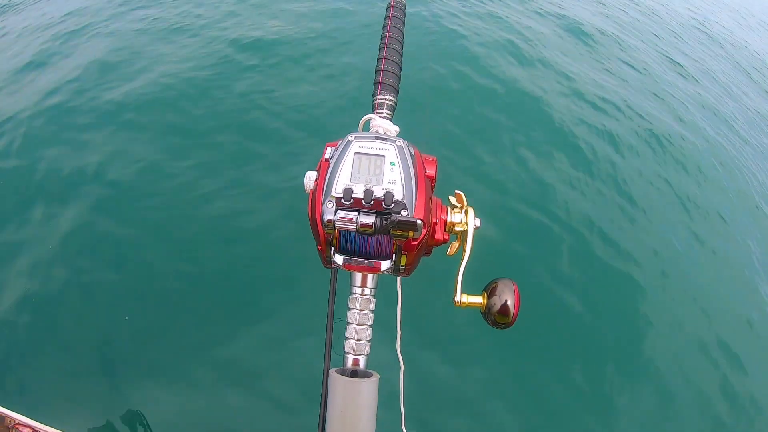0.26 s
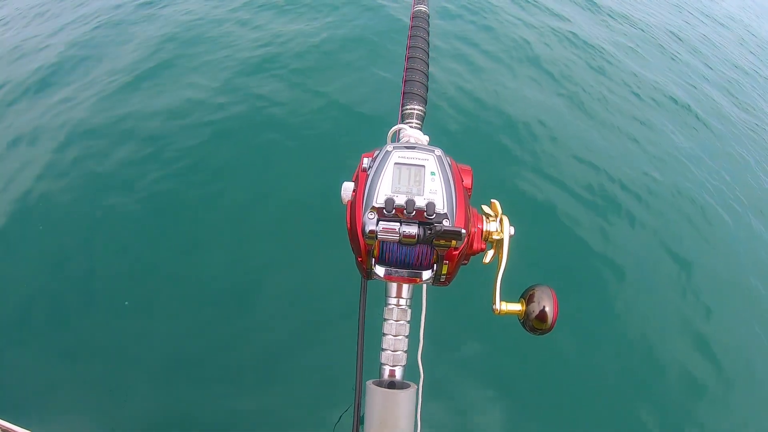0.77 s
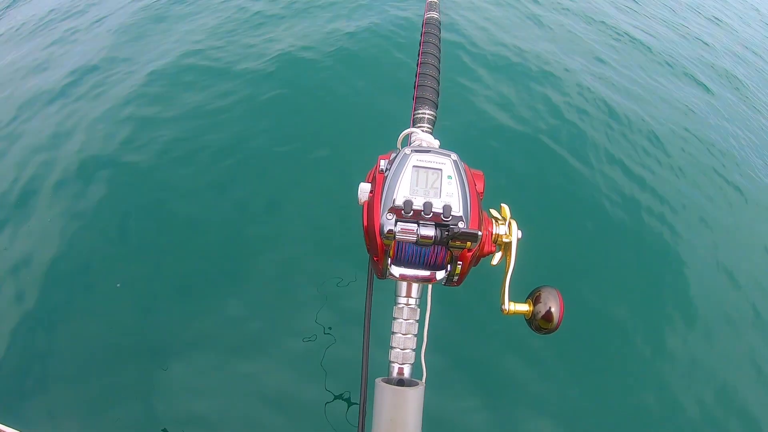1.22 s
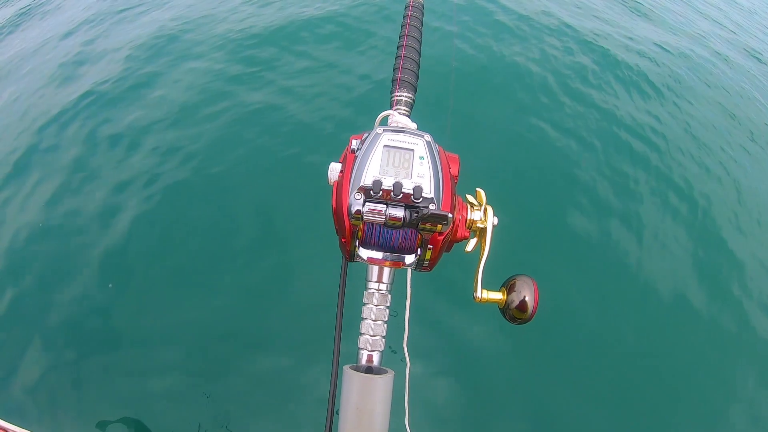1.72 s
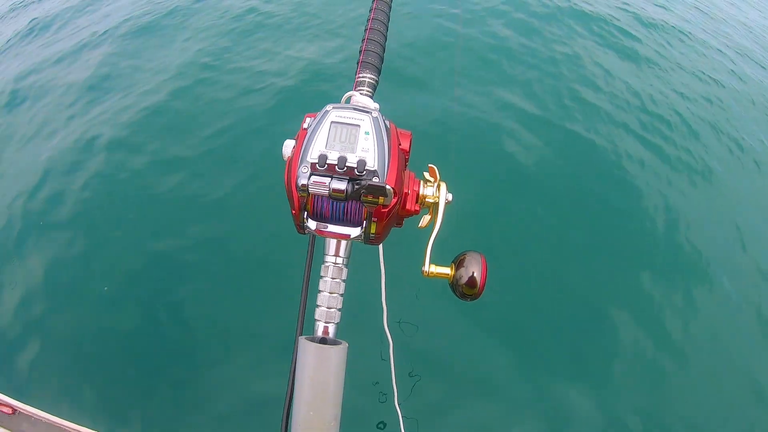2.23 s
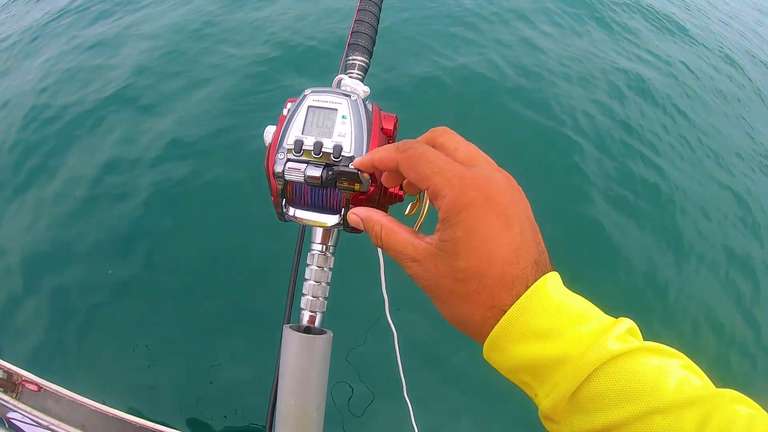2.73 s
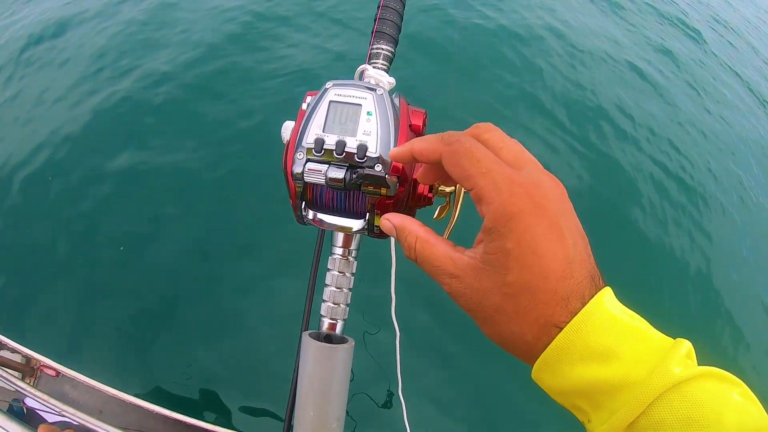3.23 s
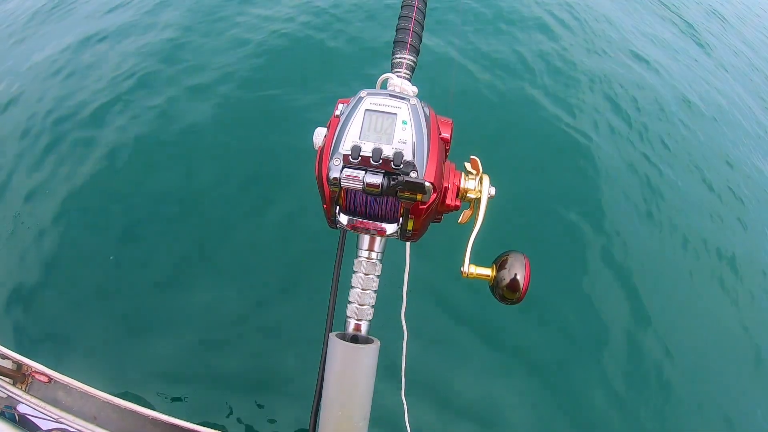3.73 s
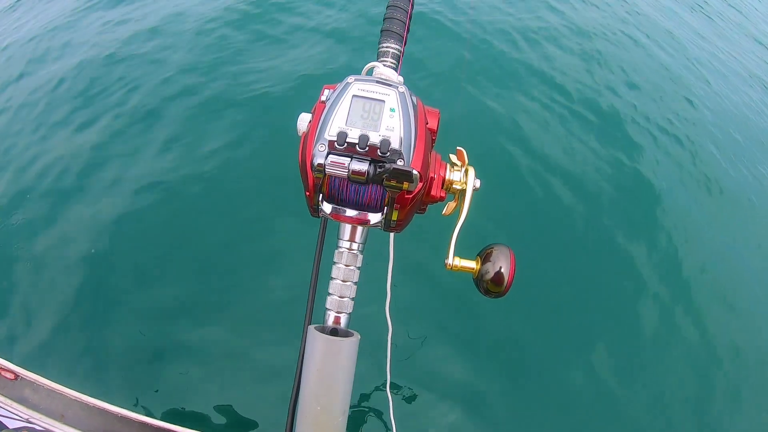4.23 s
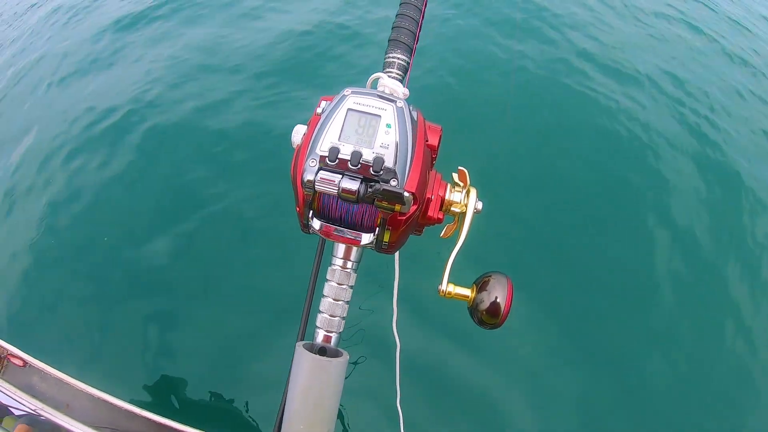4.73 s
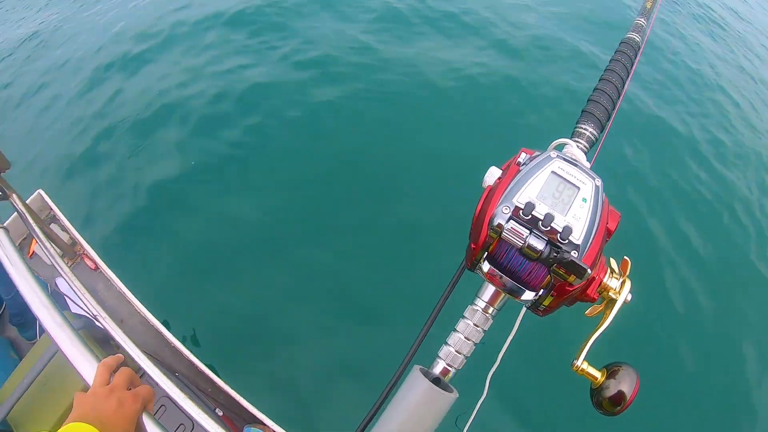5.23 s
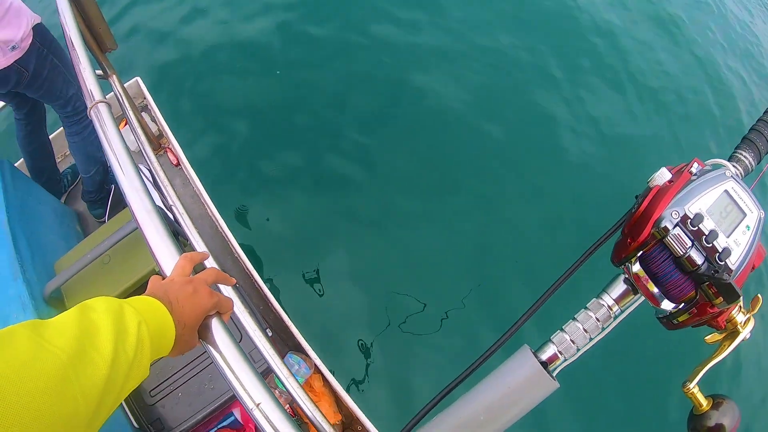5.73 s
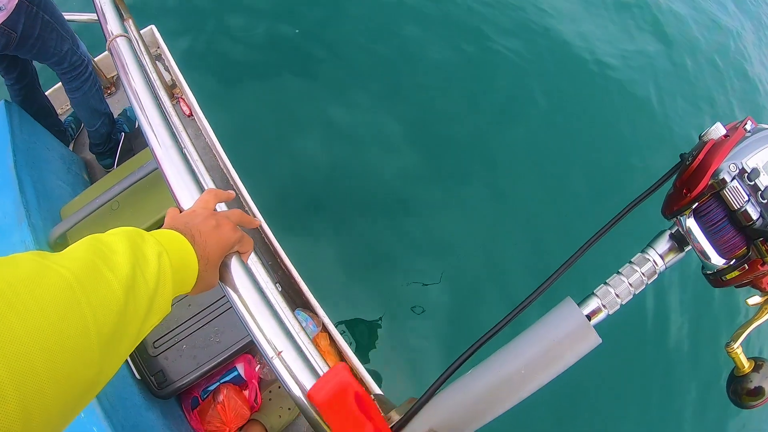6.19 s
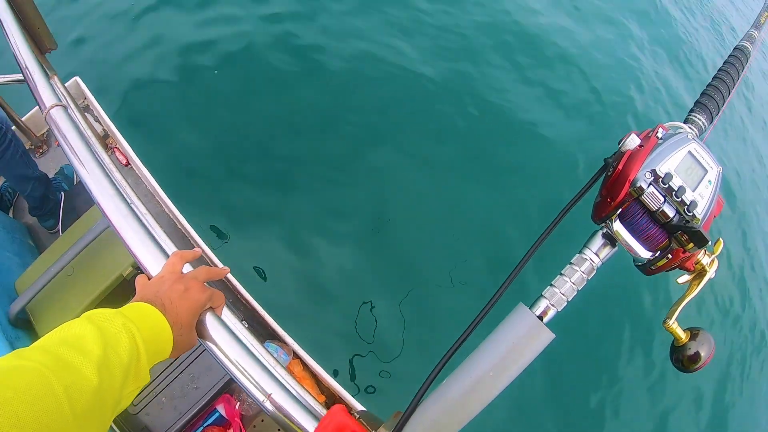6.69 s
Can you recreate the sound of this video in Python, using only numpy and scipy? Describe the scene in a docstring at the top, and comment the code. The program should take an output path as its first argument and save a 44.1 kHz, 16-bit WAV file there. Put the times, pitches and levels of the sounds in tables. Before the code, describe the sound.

An electric fishing reel runs without pause close to a head-worn microphone outdoors on a boat. Its buzzing, nearly constant whine carries a gritty gear rasp, tooth chatter and a thin, high bearing squeak. Small waves slap and bubble against the hull now and then, and low gusts rumble on the microphone. One dull bump lands near the middle; towards the end the head turns and the whine changes colour and stereo balance.

```python
"""An electric fishing reel winds in line on a boat, close to a head-worn camera. Its motor and gear teeth whine
at a nearly constant speed over a rasp of tooth contact; the spool gear wavers with the pull of the fish.
Loose teeth chatter, a dry bearing squeaks, and a hand held by the reel reflects some tones and bumps it once.
Water slaps the hull, gusts touch the microphone, and near the end the head turns towards the deck.
Tones follow the turning wheels; shaped noise makes rasp, water and wind."""
import sys
import numpy as np
from scipy import signal
from scipy.fft import rfft, irfft
from scipy.io import wavfile
from scipy.ndimage import map_coordinates

SR = 44100
rng = np.random.default_rng(int(sys.argv[2]) if len(sys.argv) > 2 else 0)


def wrap_up_sound(samples):
    """Save the sound to the file named by the first command line argument, as 16-bit audio."""
    columns = np.atleast_2d(samples).T
    # keep every value between -1 and 1, then stretch to whole-number steps
    tamed = np.clip(columns, -1, 1)
    steps = np.round(tamed * 32767).astype(np.int16)
    wavfile.write(sys.argv[1], SR, steps)


N = 306495
T = np.arange(N) / SR
FREQS = np.fft.rfftfreq(N, 1 / SR)
SIDES = np.array([[.5], [-.5]])  # shares a left-right difference between the two ports

IDLER_TEETH = 14
MOTOR_PER_IDLER = 17 / 5  # motor turns per idler turn


def from_db(db):
    """Decibels to gain."""
    return 10 ** (np.asarray(db) / 20)


def curves(rows):
    """Each column of a time table, joined by straight lines."""
    s, *columns = np.transpose(rows)
    return [np.interp(T, s, c) for c in columns]


def spectra(rows, at=FREQS):
    """Each column of a frequency table, joined on a log axis."""
    hz, *columns = np.transpose(rows)
    return [np.interp(np.log(at + 1), np.log(hz), c) for c in columns]


def noise(db):
    """Noise with the given level per Hz."""
    return irfft(rfft(rng.standard_normal(N)) * from_db(db), N) * np.sqrt(SR / 2)


def unit(x):
    """Scale to rms 1."""
    return x / np.sqrt(np.mean(x ** 2))


def walk(rate):
    """Random wander of spread 1: straight lines between `rate` new values a second."""
    steps = rng.standard_normal(2048)
    place = T * rate
    k = place.astype(int) % (len(steps) - 1)
    between = steps[k] + (steps[k + 1] - steps[k]) * (place % 1)
    return between * np.sqrt(3 / 2)  # makes up for the spread lost between the values


def ports(wave, balance_db, lead_rad):
    """A complex tone as it reaches the left and right microphone port."""
    return np.real(wave * from_db(SIDES * balance_db) * np.exp(1j * SIDES * lead_rad))


def tone(turns):
    """A complex tone that follows a count of cycles, from a random start."""
    angle = (2 * np.pi * ((turns + rng.random()) % 1)).astype(np.float32)
    return np.cos(angle) + 1j * np.sin(angle)


def ring(t, hz, peak_s):
    """A damped ring that swells to height 1 at `peak_s`, then dies away."""
    return (t / peak_s) ** 2 * np.exp(2 - 2 * t / peak_s + 2j * np.pi * hz * t)


# Colour of the wind rumble. Each row: frequency in Hz, relative level in dB.
BREEZE_COLOUR = [(12, -20), (30, -5), (52, 4), (100, -4), (180, -8.5), (400, -63), (1200, -56)]
# Gusts on the microphone. Each row: peak in seconds, level in dB, length in seconds.
GUSTS = [(0.103, -52, 0.31), (0.34, -40.5, 0.18), (2.032, -52, .1), (2.5, -58, 0.63), (2.873, -42.5, 0.23),
         (3.097, -40, 0.12), (3.26, -42, 0.11), (3.436, -43.5, 0.22), (3.553, -42.5, 0.095),
         (3.968, -57.5, 0.27), (4.764, -45, 0.09), (5.025, -47, 0.11), (5.38, -45, 0.28), (5.65, -46, 0.18),
         (6.007, -40, 0.21), (6.342, -46, 0.18), (6.82, -55, 0.33)]
GUST_RISE = 0.4  # share of a gust spent rising
CALM_DB = -71  # the breeze between gusts


def breeze(left_db=-1, right_db=2, eddy_db=3.0):
    """Each gust builds and dies away over a calm breeze; its eddies rumble on each port separately."""
    power = from_db(CALM_DB) ** 2
    for s, db, length_s in GUSTS:
        away = np.maximum((s - T) / GUST_RISE, (T - s) / (1 - GUST_RISE)) / length_s
        power = power + (from_db(db) * np.exp(-away)) ** 2
    (colour_db,) = spectra(BREEZE_COLOUR)
    rumble = [unit(noise(colour_db)) * from_db(port_db + eddy_db * walk(20)) for port_db in (left_db, right_db)]
    return np.sqrt(power) * np.array(rumble)


# Water against the hull. Each row: start in seconds, level in dB, ring pitch in Hz, time to peak in seconds.
SLAPS = [(0.342, -40, 220, .004), (0.373, -34.5, 380, 0.0056), (0.403, -40, 148, 0.0086),
         (0.582, -39.5, 347, 0.0085), (1.339, -43.5, 270, 0.008), (1.997, -37, 190, 0.0045),
         (2.022, -34.5, 315, 0.0068), (2.053, -38.5, 201, 0.0084), (2.163, -39.5, 257, 0.0074),
         (3.958, -44, 204, 0.011), (4.690, -37.5, 240, 0.0074), (4.718, -36, 225, 0.0066),
         (4.759, -39.5, 252, .01), (4.802, -41, 300, 0.0098), (4.986, -38, 263, 0.0099),
         (5.228, -31, 235, .009), (5.249, -33, 252, 0.012), (6.327, -36, 170, .006),
         (6.339, -36, 210, .006), (6.885, -29.5, 480, .003)]
# What the hull rings with. Each row: multiple of the slap's pitch, level in dB relative to the slap.
HULL_MODES = [(.62, -9.5), (1, -1.5), (1.85, -8)]


def slaps(smack_db=-10.5, splash_db=-16, splash_s=0.058, bubble_db=-13, bubble_late_s=.025,
          spread=0.265, width_rad=0.4, count=5):
    """Each wavelet smacks the hull into a short ring; a dull splash and small rising bubbles follow."""
    out, t = np.zeros((2, N + SR)), T[:SR // 3]
    for s, db, hz, peak_s in SLAPS:
        late, size, bearing = rng.standard_normal((3, count, 1, 1))
        age = np.maximum(t - np.abs(late) * bubble_late_s, 0)
        bubble_hz = 1.7 * hz * np.exp(spread * size) * (1 + age)  # the pitch climbs with age
        bubbles = ports(ring(age, bubble_hz, peak_s / 2), 0, width_rad * bearing).sum(axis=0)

        hull = sum(from_db(mode_db) * ring(t, ratio * hz, peak_s / max(ratio, 1))
                   for ratio, mode_db in HULL_MODES)

        dull = signal.butter(2, [hz / 2, hz * 1.8], "band", fs=SR, output="sos")
        shared, left, right = unit(signal.sosfilt(dull, rng.standard_normal((3, len(t)))))
        smack = from_db(smack_db) * ring(t, 0, peak_s / 2).real
        splash = from_db(splash_db) * np.exp(-t / splash_s) * np.minimum(t / peak_s, 1)
        water = (shared + np.array([left, right]) / 2) * (smack + splash)

        start = int(s * SR)
        slap = ports(hull, 0, width_rad) + water + from_db(bubble_db) * bubbles
        out[:, start:start + len(t)] += from_db(db) * slap
    return out[:, :N]


def bump(start_s=3.085, level_db=-29.5, hz=78, peak_s=.007, balance_db=-2, lead_rad=0.54):
    """The hand bumps the reel: one low, damped thud as it withdraws."""
    thud = ring(np.maximum(T - start_s, 0), hz, peak_s)
    return from_db(level_db) * ports(thud, balance_db, lead_rad)


CHIRP_DB, CHIRP_TURNED_DB = -44, 0.5  # level, rise with the head turned


def chirps(idler, turned, rate=57.3, start_hz=9260, rise_hz=750, depth=0.4,
           jitter_hz=80, jitter_rate=500, patchy_db=3.5):
    """A dry bearing gives tiny rising squeaks, pressed harder once per turn of the middle wheel."""
    place = rate * T % 1  # 0-1 through each squeak
    hz = start_hz + rise_hz * place ** 3 + jitter_hz * walk(jitter_rate)
    squeak = tone(np.cumsum(hz) / SR)
    pressure = np.sin(np.pi * place) ** 2 * np.exp(depth * tone(WHEELS[1] * idler).real)
    pressure = pressure * from_db(patchy_db * walk(rate))
    level = from_db(CHIRP_DB + CHIRP_TURNED_DB * turned)
    return ports(np.sqrt(2) * level * unit(pressure) * squeak, *placed(LEAD_PLACE[-1], turned))


CHATTER_DB, CHATTER_TURNED_DB = -42.5, -12  # level, change with the head turned


def chatter(idler, turned, ring_hz=2590, peak_s=0.00095, wear_db=5, scatter_db=2.0, teeth=21):
    """Teeth knock the housing into a short ring; the worn ones knock hardest on every turn of their wheel."""
    tooth = (IDLER_TEETH * idler).astype(int)
    at = np.flatnonzero(np.diff(tooth))  # the moments when the next tooth meets
    wear = from_db(wear_db * rng.standard_normal(teeth))
    scatter = from_db(scatter_db * rng.standard_normal(len(at)))
    knocks = np.zeros(N)
    knocks[at] = wear[tooth[at] % teeth] * scatter * rng.choice([-1, 1], len(at))
    t = T[:SR // 50]
    housing = signal.fftconvolve(knocks, t * np.exp(2j * np.pi * ring_hz * t - t / peak_s))[:N]
    level = from_db(CHATTER_DB + CHATTER_TURNED_DB * turned)
    balance_db, lead_rad, _ = spectra(PORTS, ring_hz)
    return ports(housing / np.std(housing.real) * level, balance_db, lead_rad)


# Rasp of teeth, brushes and line, before its overall level is set.
# Each row: frequency in Hz, level in dB per Hz facing the reel, level in dB per Hz with the head turned.
RASP = [(100, -95, -85.5), (163, -83, -80.5), (240, -83, -83), (380, -87.5, -81.5), (496, -87.5, -81.5),
        (610, -79, -79.5), (776, -78, -83), (1260, -72, -69), (1483, -73, -76), (1840, -79.5, -77),
        (1864, -81, -73), (2130, -69, -73), (2950, -64, -72), (3100, -69, -71.5), (3520, -63.5, -73),
        (3630, -68.5, -74.5), (5730, -73.5, -75), (6170, -71, -77), (6960, -81, -82.5), (9500, -78.5, -81),
        (9650, -75.5, -79), (10870, -83, -84.5), (11370, -105, -105), (13400, -90, -89),
        (15000, -100, -100)]
# The two microphone ports.
# Each row: frequency in Hz, left minus right in dB, left lead in radians, scattered share of the power 0-1.
PORTS = [(300, -1, 0, .15), (800, -2.5, .3, .1), (1400, -1.5, .8, .3), (2000, -2, -.3, .12),
         (3000, -2.5, .5, .07), (4600, 1.5, .5, .2), (6200, 0, -.2, .25), (6900, 0, .9, .4),
         (7700, 1.5, 3.4, .5), (9000, 3.5, 3.4, .4), (10800, 1, 6.3, .35), (15000, .5, 6.3, .6)]
# Slower wheels of the gear train. One value each: turns per idler turn.
WHEELS = [1 / 5, 18 / 37, 2 / 3]
RASP_DB, RASP_TURNED_DB, RASP_SWELL = 0.62, 2.5, 0.11  # level, rise with the head turned, share of the swell


def worn_wheel(turns):
    """The rough faces of one wheel come round again on every turn: an even weave of faint lines."""
    surface = irfft(np.exp(2j * np.pi * rng.random(int(N / turns[-1] / 2))))
    return unit(map_coordinates(surface, [turns % 1 * len(surface)], order=3, mode="grid-wrap"))


def rasp(idler, turned, swell, mesh_depth=0.2, motor_depth=0.015, idler_depth=0.066,
         flicker_db=0.78, repeating=.5):
    """Sliding contact hisses in time with the teeth, the motor and the idler, coloured by the housing."""
    level_db = RASP_DB + RASP_TURNED_DB * turned + RASP_SWELL * swell
    beat = 1 + mesh_depth * tone(IDLER_TEETH * idler).real
    beat = beat + motor_depth * tone(MOTOR_PER_IDLER * idler).real
    beat = beat + idler_depth * tone(2 * idler).real  # twice per idler turn
    beat = beat * from_db(level_db + flicker_db * walk(50))

    sliding, *bounced = rng.standard_normal((3, N))
    worn = unit(sum(worn_wheel(ratio * idler) for ratio in WHEELS))
    contact = np.sqrt(1 - repeating) * sliding + np.sqrt(repeating) * worn

    direct, left, right = rfft(np.array([contact, *bounced]) * beat) * np.sqrt(SR / 2)
    balance_db, lead_rad, scattered = spectra(PORTS)
    heard = np.sqrt(1 - scattered) * direct * np.exp(1j * SIDES * lead_rad)
    heard = heard + np.sqrt(scattered) * np.array([left, right])
    facing, aside = (irfft(heard * from_db(db + SIDES * balance_db), N) for db in spectra(RASP))
    return (1 - turned) * facing + turned * aside


# Spool gear speed. Each row: time in seconds, mesh rate in Hz before its shudder.
SPOOL = [(0, 632), (.4, 672), (1.4, 658), (2.4, 700), (2.9, 614), (3.4, 612), (4.4, 672), (5.15, 664),
         (5.5, 632), (6.03, 617), (6.45, 640), (6.65, 624), (6.95, 686)]
# Its harmonics 1 to 9. Each row: level in dB, dB more with the head turned.
SPOOL_DB = [(-59, -6), (-53.5, -7), (-57, 8.5), (-49, -14), (-61, 9), (-58, 8), (-52.5, 4), (-59, 14),
            (-60, -3)]


def spool(turned, wobble_hz=2.18, wobble_rate=60, patchy_db=3, patchy_rate=14):
    """The spool gear speeds up and slows with the pull on the line; it shudders, its harmonics come and go."""
    (hz,) = curves(SPOOL)
    turns = np.cumsum(hz + wobble_hz * walk(wobble_rate)) / SR
    out = 0
    for harmonic, (db, turned_db) in enumerate(SPOOL_DB, 1):
        patchy = unit(from_db(patchy_db * walk(patchy_rate)) * tone(harmonic * turns).real)
        out = out + from_db(db + turned_db * turned) * patchy
    return out


# Weaker motor tones. One value each: multiple of the motor's turn; then their levels in dB.
MOTOR_ORDERS = [1, 5, 6, 10, 12, 15, 22, 33, 35]
MOTOR_DB = [-58.5, -51.5, -60, -45, -42.5, -45.5, -60, -57, -56.5]
# Weaker gear tones. One value each: multiple of the idler's turn; then their levels in dB.
GEAR_ORDERS = [12, 13, 14, 15, 16, 24, 26, 27, 32, 36, 41, 43, 45, 50, 55, 56, 57, 59, 64, 65, 69, 70, 82]
GEAR_DB = [-52, -55.5, -52.5, -57, -60, -54, -50, -45.5, -50, -48, -44, -46, -54, -56, -55, -52, -57, -58,
           -56, -56, -55, -46, -58]
# Off-centre wheels put side tones around the leading tones.
# Each row: multiple of the idler's turn, list of offsets in Hz; then one level in dB for each offset in turn.
SIDE_TONES = [(14, [-309.6, -262, -225.5]),
              (28, [-403, -309.6, -288, -225.5, -121.4, -60.7, 44.3, 127.5, 225.5, 309.6, 365]),
              (42, [-383.5, -309.6, -273, -225.5, -218, -135, -91, -44.3]), (54, [-69, 121.4]),
              (68, [309.6]), (102, [-57.3, -13, 44.3])]
SIDE_DB = [-55, -57, -57, -55, -46, -51, -50, -48, -43, -43.5, -41.5, -46, -41.5, -50, -46, -49, -52, -50,
           -49, -48, -49, -48, -52, -52, -56, -52, -49, -52]


def overtones(idler, turned, swell, swell_db=1.44, swell_rate=3.48, side_share=0.11, side_turned_db=-1):
    """Weaker motor, gear and side tones; each swells by itself and shifts with the head like the rasp."""
    cycles = [(k * MOTOR_PER_IDLER * idler, 0) for k in MOTOR_ORDERS]
    cycles += [(k * idler, 0) for k in GEAR_ORDERS]
    # side tones of the second mesh harmonic take a share of its swell
    with_mesh = side_share * swell + side_turned_db * turned
    for k, offsets in SIDE_TONES:
        follow_db = with_mesh if k == 2 * IDLER_TEETH else 0
        cycles += [(k * idler + offset * T, follow_db) for offset in offsets]

    out = 0
    for (turns, follow_db), db in zip(cycles, [*MOTOR_DB, *GEAR_DB, *SIDE_DB]):
        mean_hz = turns[-1] / T[-1]
        facing_db, aside_db = spectra(RASP, mean_hz)
        balance_db, lead_rad, _ = spectra(PORTS, mean_hz)
        gain = from_db(db + follow_db + swell_db * walk(swell_rate) + turned * (aside_db - facing_db))
        out = out + ports(np.sqrt(2) * gain * tone(turns), balance_db, lead_rad)
    return out


def hand_near(arrives_s=1.97, reach_s=0.54, leaves_s=2.58, withdraw_s=2.4):
    """0-1: the hand reaches for the reel, stays, and withdraws."""
    return np.clip((T - arrives_s) / reach_s, 0, 1) * np.clip(1 - (T - leaves_s) / withdraw_s, 0, 1)


def placed(place, turned):
    """Port balance in dB and lead in radians, moving from facing to turned with the head."""
    return [np.interp(turned, [0, 1], pair) for pair in (place[:2], place[2:])]


# The seven leading tones: motor x3, mesh x2, mesh x3, a fine gear, motor x20, x25 and x30.
# One value each: multiple of the idler's turn.
LEAD_ORDERS = [10.2, 28, 42, 54, 68, 85, 102]
# Their loudness. Each row: level in dB, dB more with the head turned, dB more with the hand near,
# share of the swell.
LEAD_LOUDNESS = [(-35.5, -4, -0.8, -0.049), (-34, -6.5, 1, 0.94), (-33, 4, 7, 0.093),
                 (-42.5, -0.5, 3, 0.37), (-46, 5, 2, -0.37), (-48, 1, 0, 0.079), (-49, 6.5, 4, 0.15)]
# Their character. Each row: roughness 0-1, flutter rate in Hz.
LEAD_COLOUR = [(0.12, 63), (0.14, 78), (0.18, 240), (0.23, 79), (0.22, 70), (1, 160), (0.2, 110)]
# Their place. Each row: left minus right in dB facing the reel, the same with the head turned,
# left lead in radians facing the reel, the same with the head turned.
LEAD_PLACE = [(.3, -12, .4, .4), (-.5, -11, 0, .4), (-1, -3, .25, -.2), (5, 1, .7, -1.2), (-2, 0, .3, -1.3),
              (8, 7, -2.3, -3.3), (-1.5, 11, -.7, 2.7)]


def whine(idler, turned, swell, runout=0.06, runout_turned=0.15):
    """The leading motor and mesh tones, shaded by head and hand; uneven tooth contact makes them flutter."""
    out, hand = 0, hand_near()
    for order, loudness, (rough, flutter_hz), place in zip(LEAD_ORDERS, LEAD_LOUDNESS, LEAD_COLOUR, LEAD_PLACE):
        level_db, turned_db, hand_db, share = loudness
        db = level_db + turned_db * turned + hand_db * hand + share * swell
        contact = 1 + rough * (walk(flutter_hz) + 1j * walk(flutter_hz)) / np.sqrt(2)
        if order > 2 * IDLER_TEETH:  # the upper tones also throb once per turn of the middle wheel
            depth = runout + runout_turned * turned
            contact = contact * (1 + depth * tone(WHEELS[1] * idler).real)
        wave = np.sqrt(2) * from_db(db) * contact * tone(order * idler)
        out = out + ports(wave, *placed(place, turned))
    return out


def swell_band(x, centre_hz, width_hz, levels, throb=1):
    """One bell-shaped band of the sound swells and fades along its level curve, and may throb."""
    (db,) = curves(levels)
    part = irfft(rfft(x) * np.exp(-((FREQS - centre_hz) / width_hz) ** 2), N)
    return x + part * (from_db(db) * throb - 1)


# The whistle near 6.3 kHz, before its throb. Each row: time in seconds, level change in dB.
WHISTLE = [(0, 0), (.4, -4.5), (.9, 0.5), (1.1, 4), (1.7, 6), (2, 1.5), (2.3, -13), (2.45, 1), (2.9, 6.5),
           (3.4, 4), (3.7, -8), (4.5, -1), (5.1, 0), (5.35, 5.5), (5.7, 3.5), (6.1, 7), (6.55, 2),
           (6.95, 2)]
# The squeal near 9.4 kHz. Each row: time in seconds, level change in dB.
SQUEAL = [(0, -8), (.3, -4.5), (.7, -7.5), (1.101, -3), (1.6, 0), (1.95, -2), (2.25, -8.5), (2.9, 0.5),
          (3.25, -3), (3.55, 0), (4.15, -3), (5, 2), (5.5, -6), (6, 4), (6.45, 8), (6.95, -3)]
# The growl around the mesh rate. Each row: time in seconds, level change in dB.
GROWL = [(0, -0.5), (.4, 1), (1.3, 2.5), (2.2, -.5), (2.6, -5), (3.1, -.5), (3.85, -1.5), (4.25, 1.5),
         (5, 1.5), (5.7, 1), (6.15, 0.5), (6.95, -1.5)]
THROB, THROB_TURNED = 0.2, 0.46  # depth of the whistle's throb, more with the head turned


def voice_bands(reel, idler, turned):
    """Three bands of the reel rise and fall; the whistle also throbs once per idler turn."""
    throb = 1 + (THROB + THROB_TURNED * turned) * tone(idler).real
    reel = swell_band(reel, 6290, 150, WHISTLE, throb)
    reel = swell_band(reel, 9430, 550, SQUEAL)
    return swell_band(reel, 1270, 150, GROWL)


# Drive speed. Each row: time in seconds, tooth mesh rate in Hz before its hunting and shudder.
SPEED = [(0.0, 1272.6), (0.4, 1274.6), (0.85, 1271.7), (1.0, 1275.6), (1.25, 1273.7), (1.78, 1275.0),
         (1.9, 1273.4), (3.28, 1272.5), (3.58, 1276.0), (3.75, 1272.8), (4.28, 1278.3), (4.67, 1275.7),
         (5.0, 1278.4), (5.38, 1274.8), (6.12, 1273.8), (6.95, 1276.9)]
# The head. Each row: time in seconds, turn from 0 facing the reel to 1 facing the deck.
HEAD = [(0, 0.23), (1.1, 0.19), (2.3, 0.021), (4.9, 0.095), (5.45, 0.86), (6.25, 1), (6.95, 0.94)]
# Swell of the second mesh harmonic; each tone or layer takes its own share.
# Each row: time in seconds, swell in dB.
SWELL = [(0, 0.5), (1.3, -2.5), (2.05, 1.5), (2.6, -2.1), (3.4, 2), (5.15, 6.3), (5.9, 4.5), (6.15, 2.5),
         (6.38, -5.5), (6.8, 4.5), (6.95, 2.5)]
HUNT_HZ, HUNT_RATE = 0.391, 7  # slow waver of the mesh rate: spread in Hz, changes per second
SHUDDER_HZ, SHUDDER_RATE = 0.7, 24  # quick waver of the mesh rate: spread in Hz, changes per second


def scene():
    """One drive speed turns the motor and gear train; the spool has its own, over water and breeze."""
    (mesh_hz,), (turned,), (swell,) = curves(SPEED), curves(HEAD), curves(SWELL)
    mesh_hz = mesh_hz + HUNT_HZ * walk(HUNT_RATE) + SHUDDER_HZ * walk(SHUDDER_RATE)
    idler = np.cumsum(mesh_hz) / SR / IDLER_TEETH  # turns so far
    tones = whine(idler, turned, swell) + overtones(idler, turned, swell) + spool(turned)
    friction = rasp(idler, turned, swell) + chirps(idler, turned)
    reel = tones + friction + chatter(idler, turned)
    return voice_bands(reel, idler, turned) + breeze() + slaps() + bump()


def record(dry, top_hz=15300):
    """The camera cuts the top: a steep low-pass."""
    return signal.sosfilt(signal.ellip(8, .2, 70, top_hz, fs=SR, output="sos"), dry)


dry = scene()
out = record(dry)
wrap_up_sound(out)
```